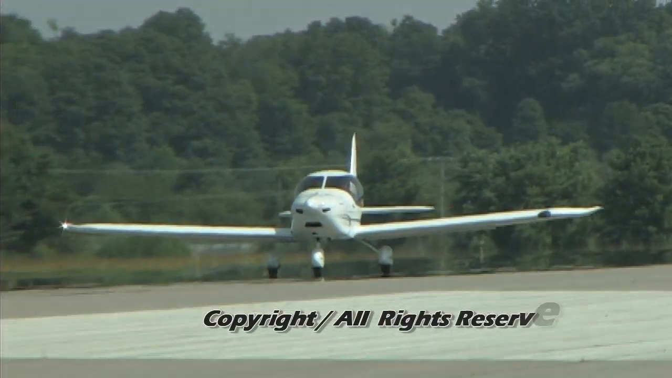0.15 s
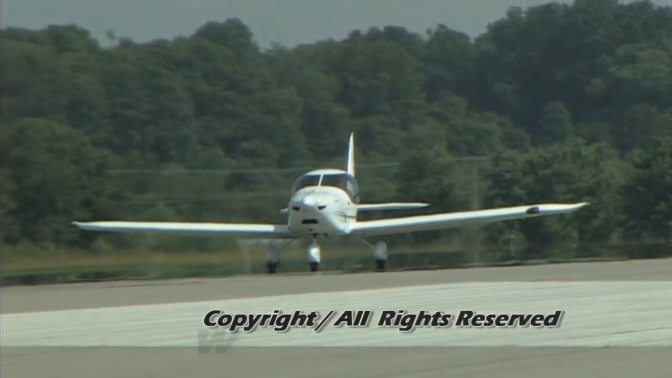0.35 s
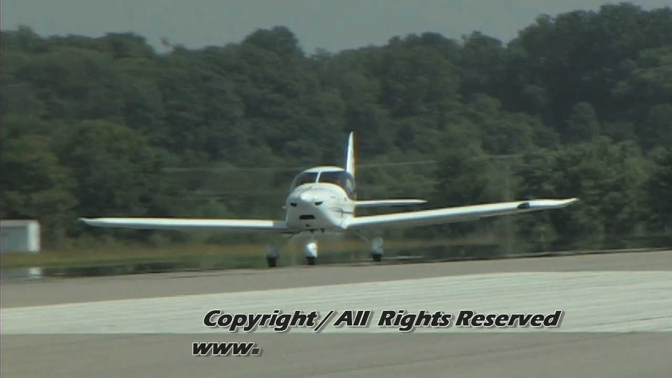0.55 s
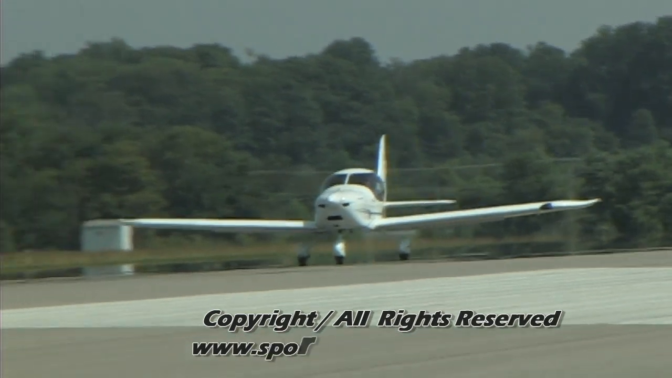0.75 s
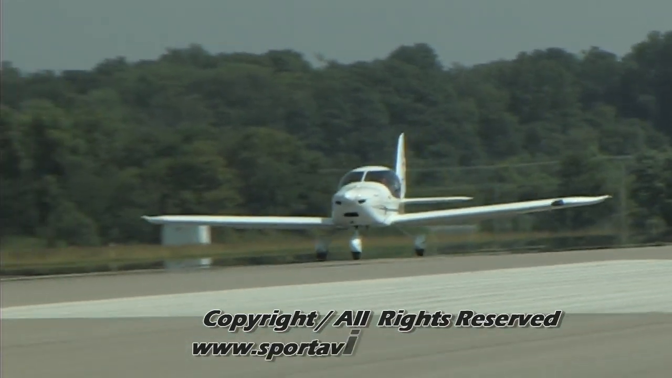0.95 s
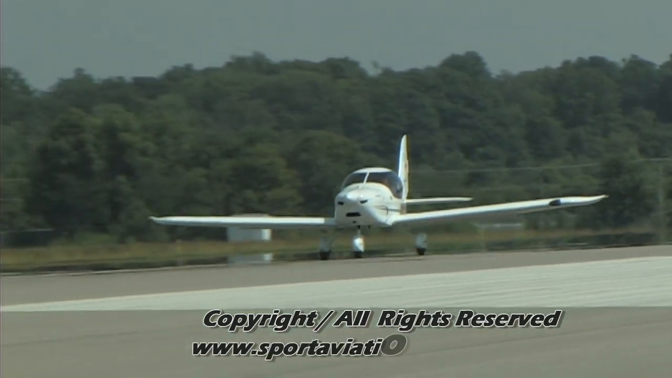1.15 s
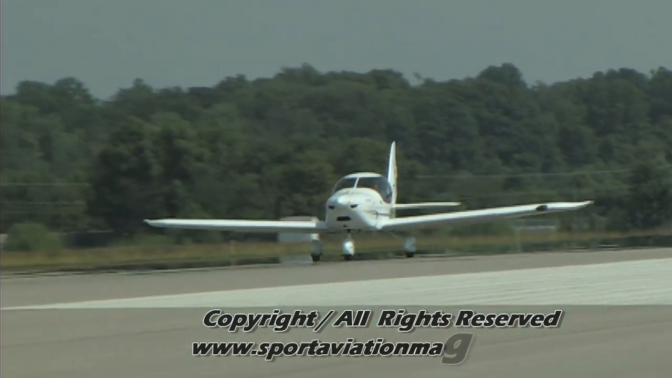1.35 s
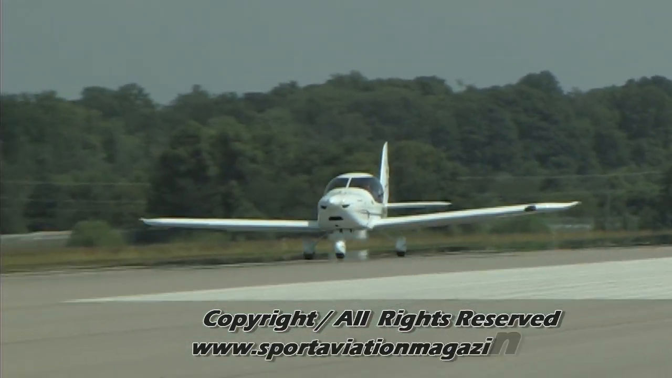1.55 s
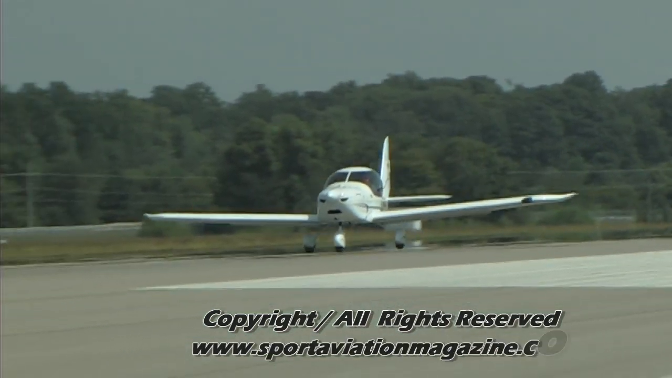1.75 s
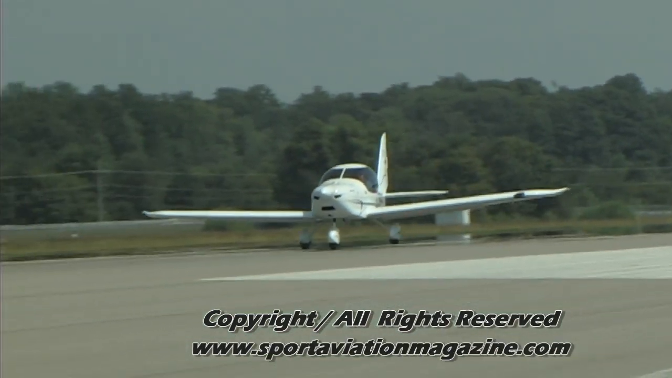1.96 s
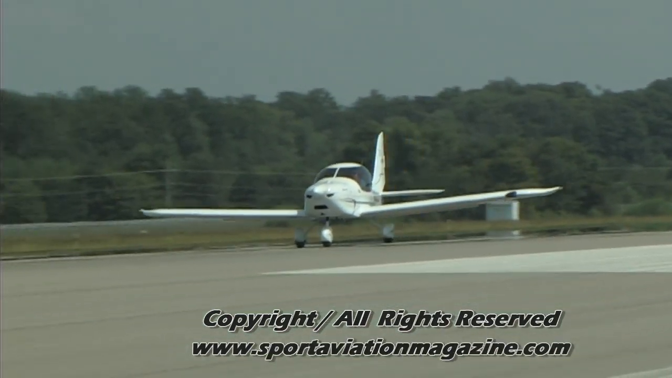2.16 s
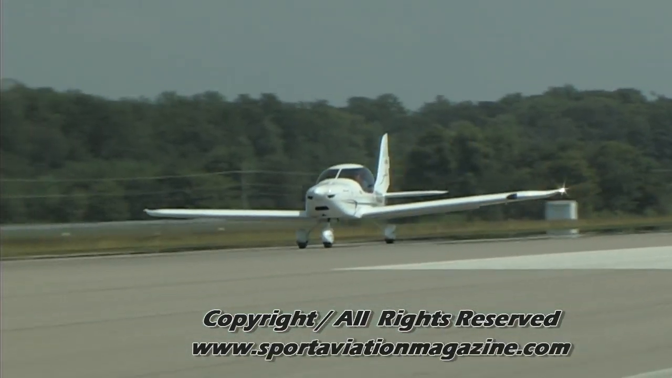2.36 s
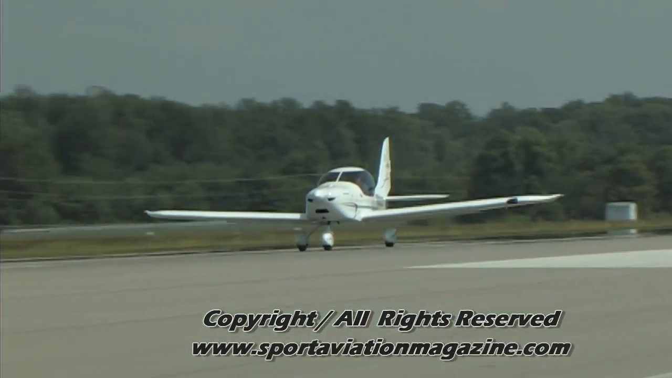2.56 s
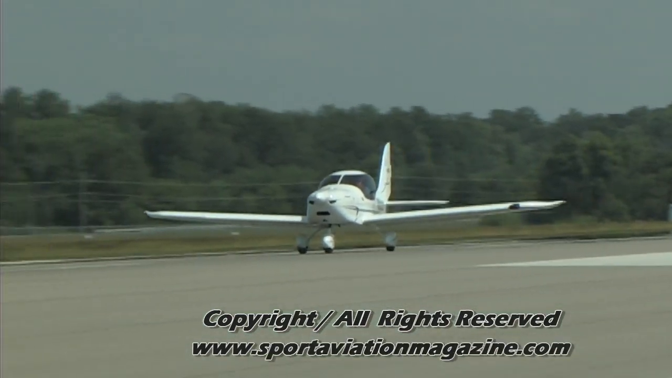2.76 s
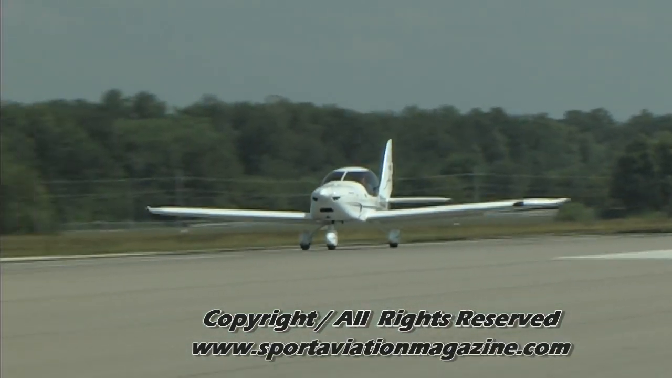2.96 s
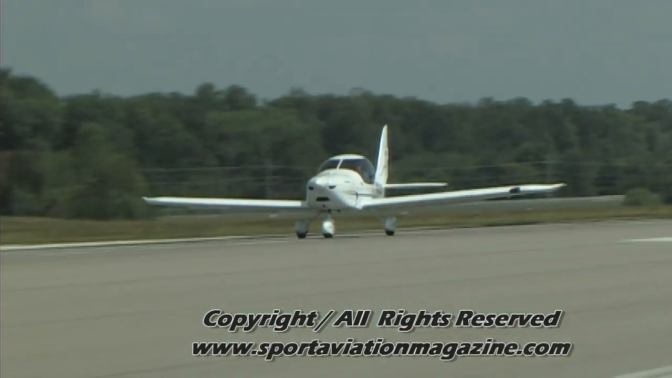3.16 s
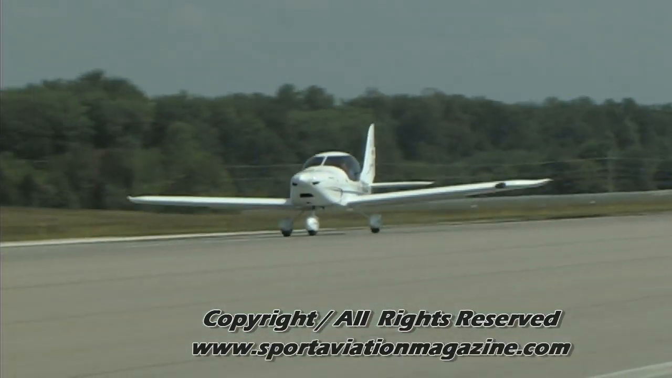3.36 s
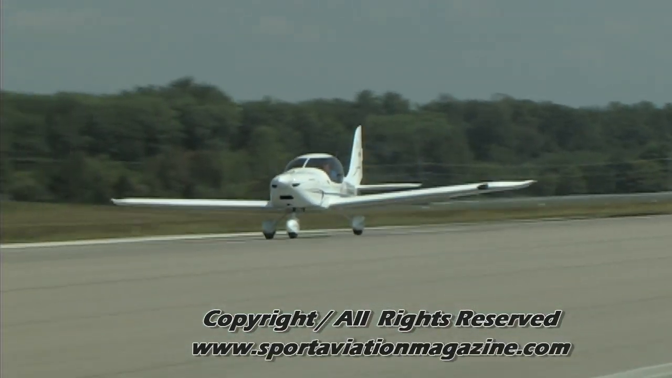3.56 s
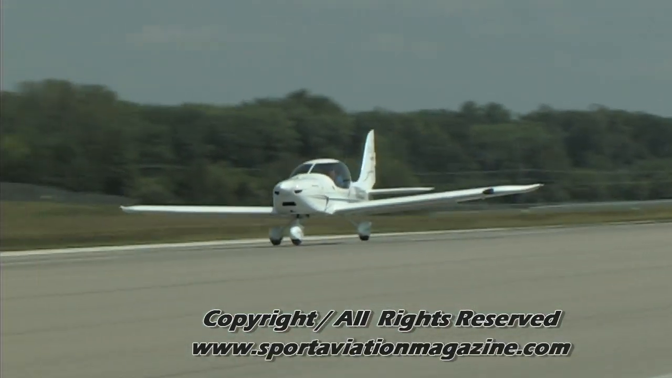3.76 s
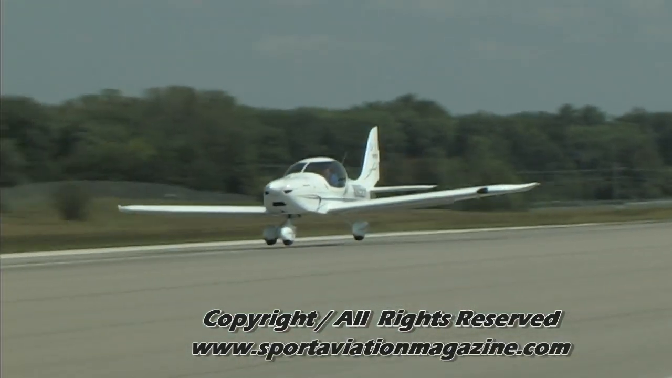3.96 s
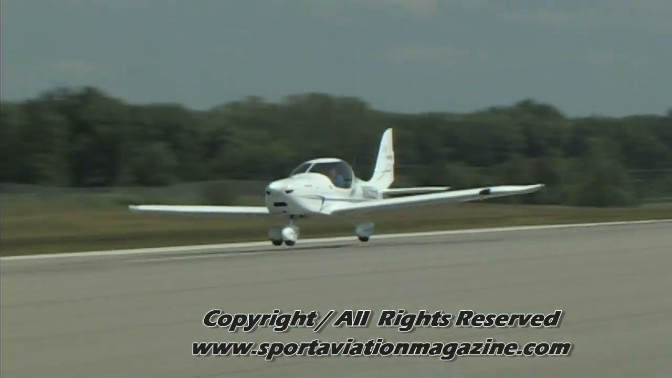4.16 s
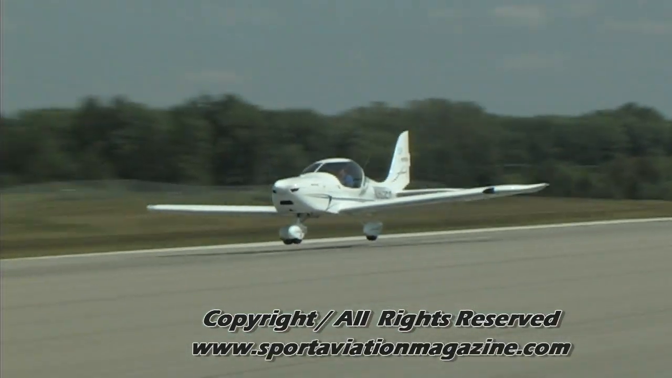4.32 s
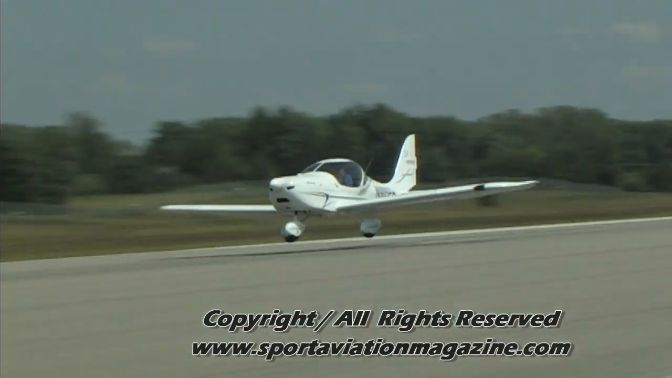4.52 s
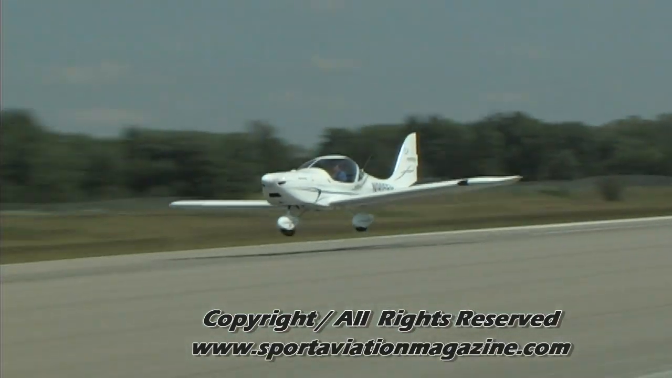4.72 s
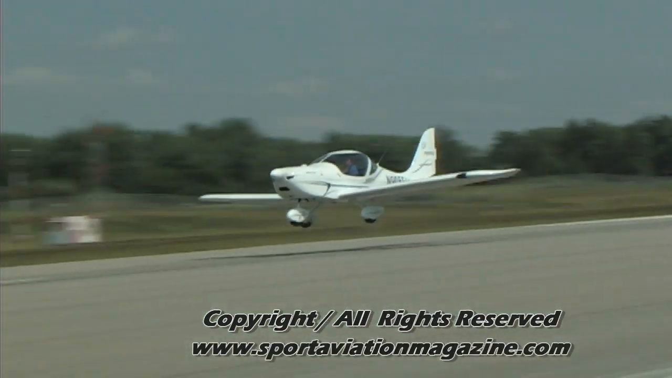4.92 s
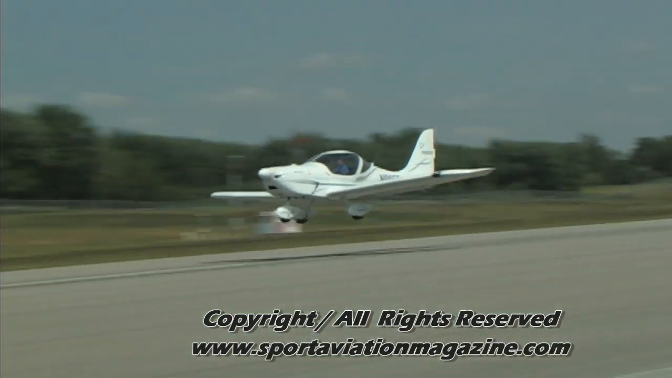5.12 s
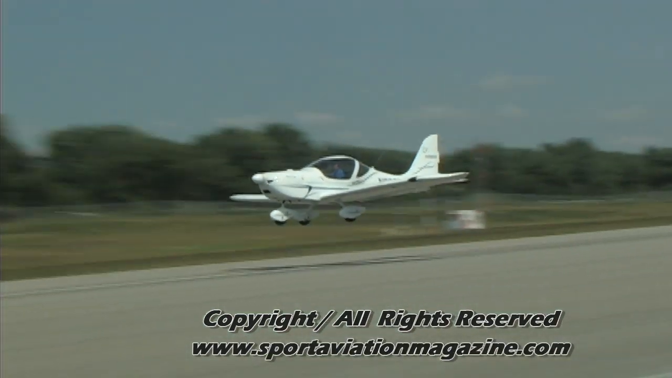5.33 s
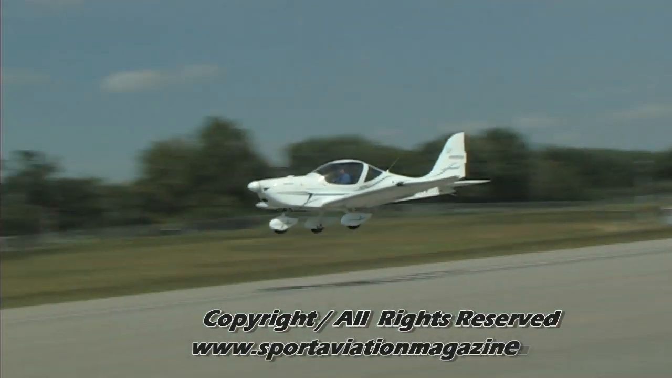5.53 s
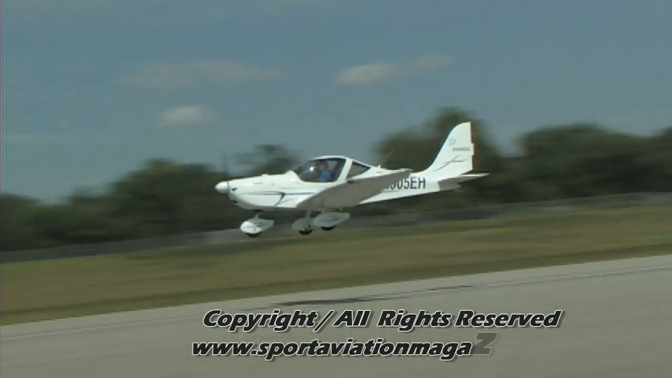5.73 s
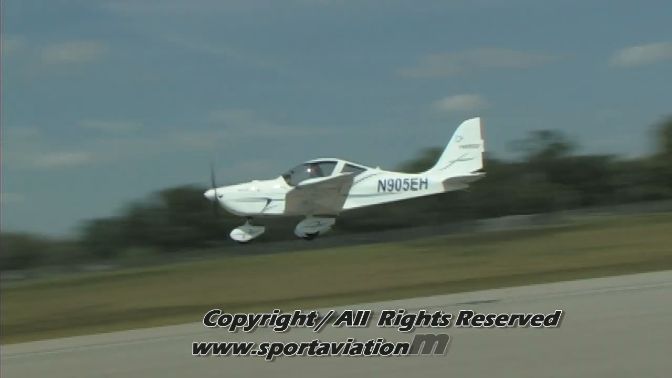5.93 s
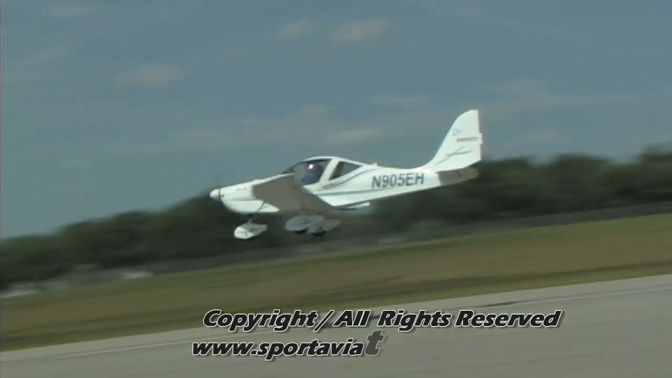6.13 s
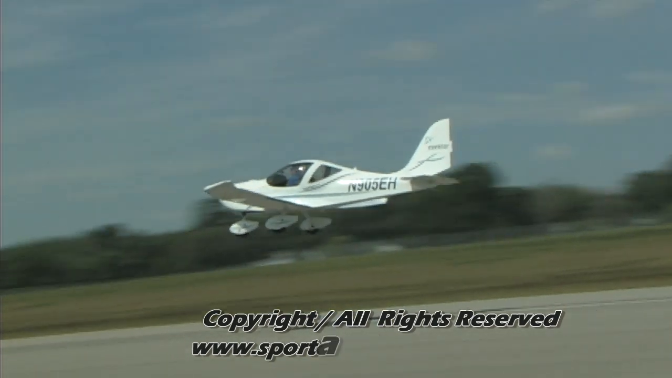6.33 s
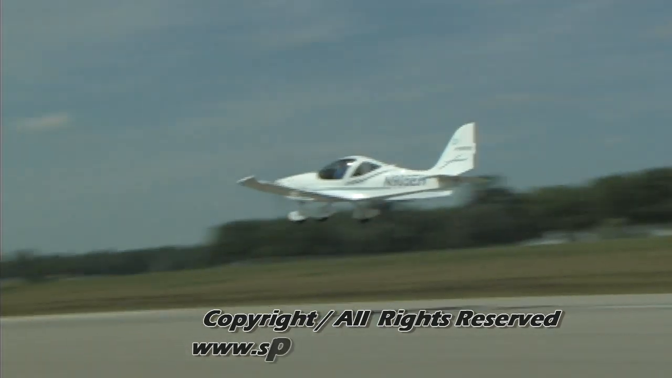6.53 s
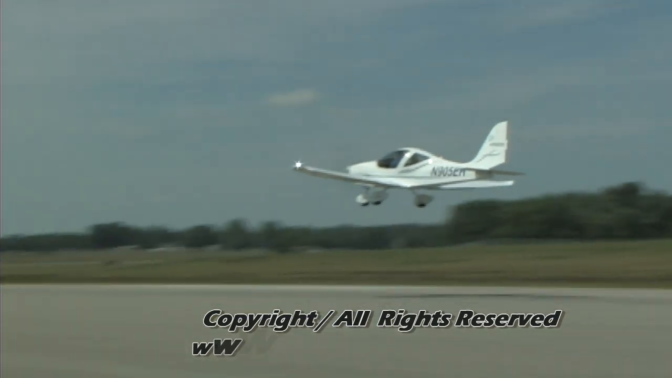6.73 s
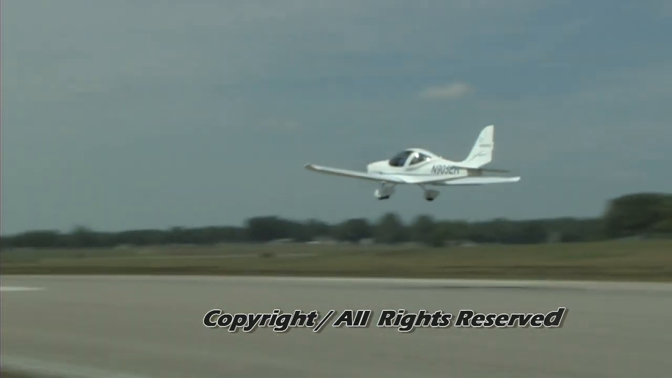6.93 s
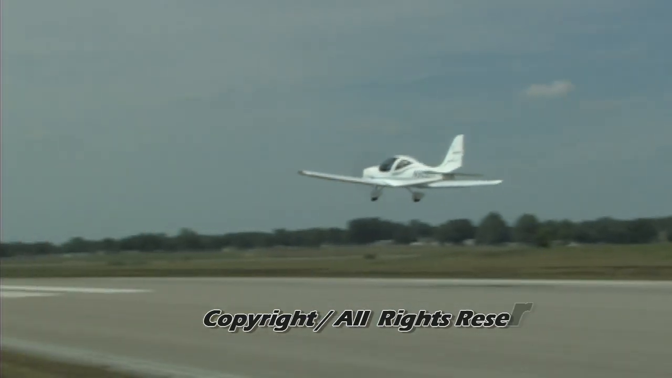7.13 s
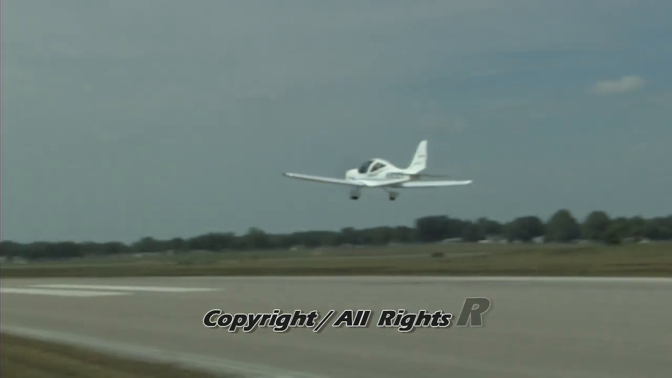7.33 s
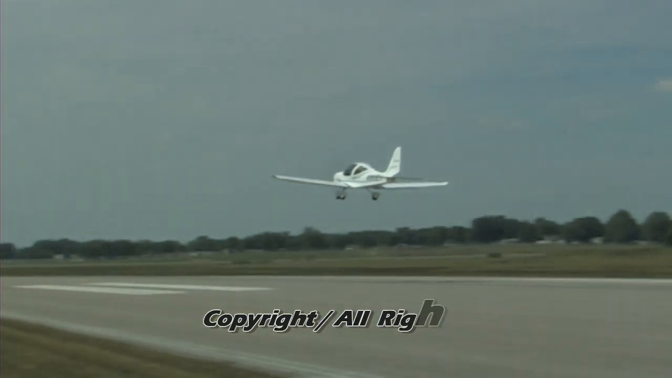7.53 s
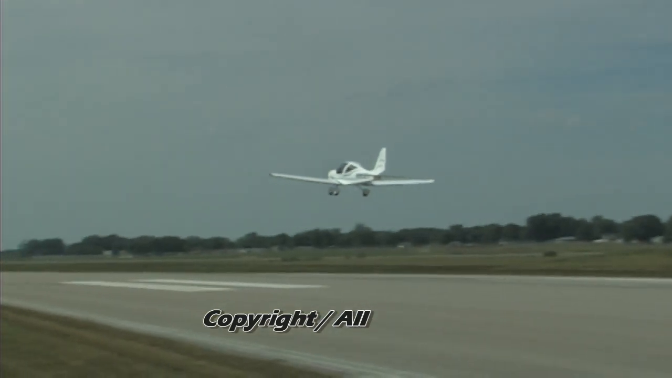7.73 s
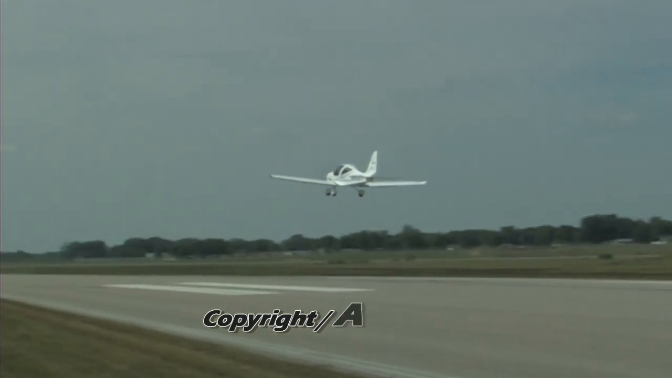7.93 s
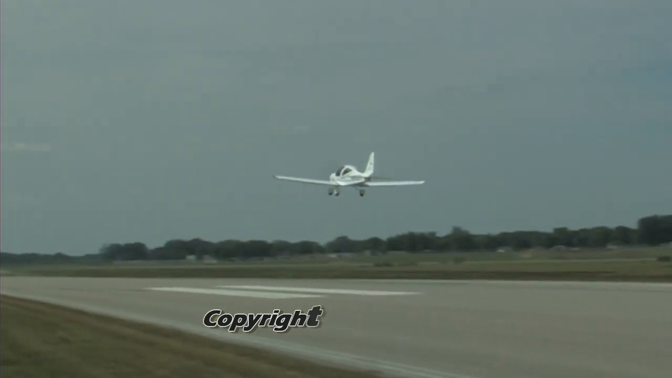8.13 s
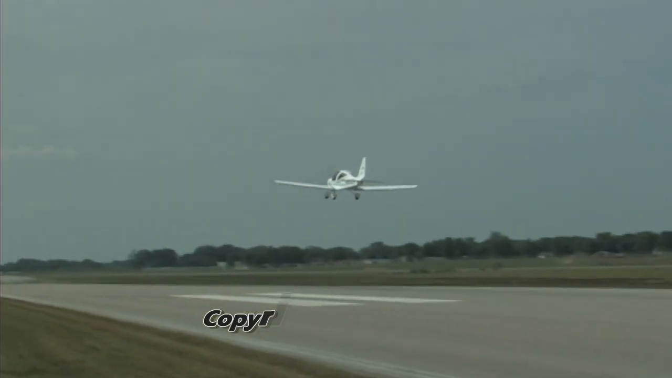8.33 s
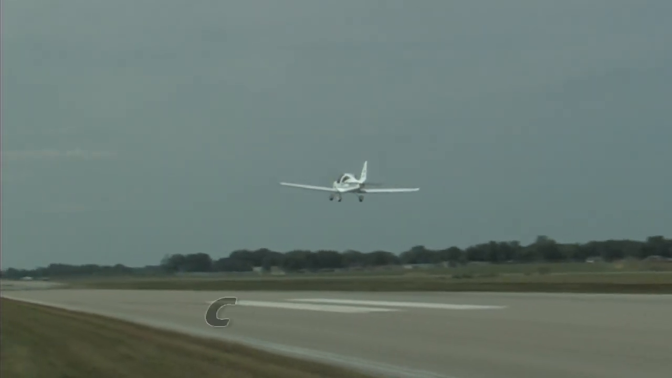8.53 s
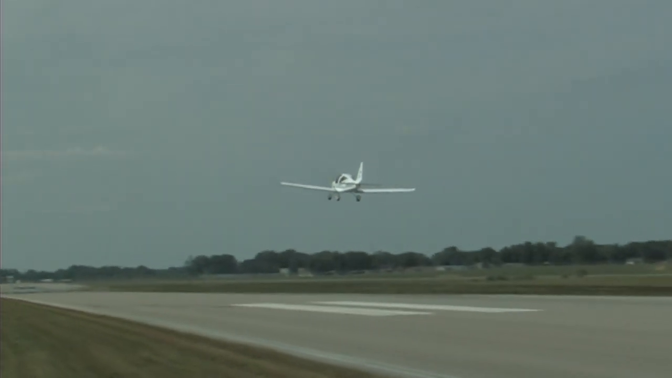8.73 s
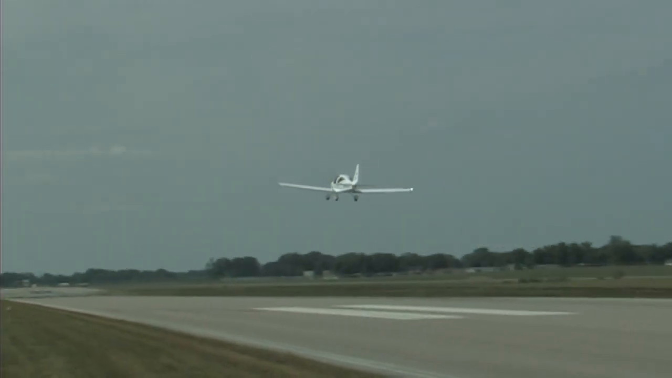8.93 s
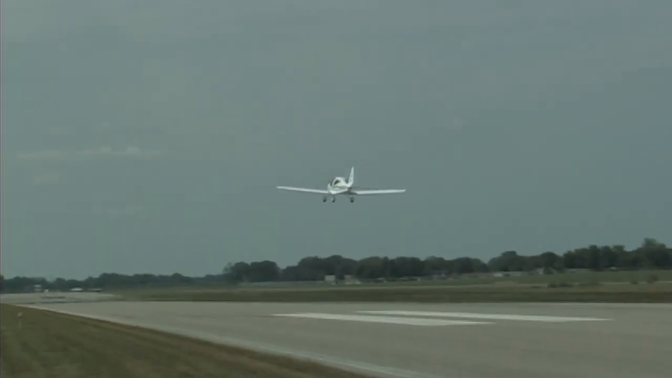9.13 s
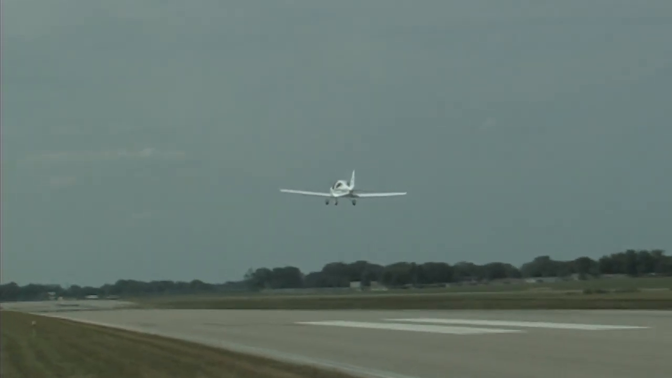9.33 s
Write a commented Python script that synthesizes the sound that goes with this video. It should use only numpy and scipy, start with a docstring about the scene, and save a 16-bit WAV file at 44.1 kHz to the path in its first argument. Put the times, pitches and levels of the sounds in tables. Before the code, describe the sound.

Light aircraft takes off: a buzzing engine grows louder, roars past with a deep blade beat, then recedes lower, leaving faint insect hiss.

```python
"""Light aircraft taking off

A four-cylinder piston engine with a geared three-blade propeller drones nearer, passes and recedes.
Engine orders and blade harmonics are sums of sines, Doppler-shifted and shaped by directional beams.
Turbulence is filtered noise pulsing with blades and firings, combed by the runway's reflection.
Steady noise gives outdoor air and insects; decaying modes give mount ticks; low bursts give breeze puffs."""
import sys
import numpy as np
from scipy import signal
from scipy.fft import rfft, irfft
from scipy.io import wavfile
from scipy.ndimage import uniform_filter1d

SR = 44100
rng = np.random.default_rng(int(sys.argv[2]) if len(sys.argv) > 2 else 0)


def file_out(sig):
    """Save sig as 16-bit WAV at sys.argv[1]."""
    # one column per channel
    cols = np.atleast_2d(sig).T
    # limit, then scale
    lim = np.clip(cols, -1, 1)
    pcm = np.round(lim * 32767).astype(np.int16)
    wavfile.write(sys.argv[1], SR, pcm)


N = 413658
TIME = np.arange(N) / SR
BINS = np.fft.rfftfreq(1024, 1 / SR)  # Hz
FRAMES = np.arange(N // 256 + 5) * 256 / SR  # s

# engine cycles (two crank turns) a second; the rate gains as airspeed unloads the propeller
CYCLE_HZ, CYCLE_GAIN_HZ_PER_S = 41.614, 0.1023
BLADES_PER_CYCLE = 42 / 17  # blade passages in an engine cycle, through the gear


def amp(db):
    """Decibel law: a level in dB becomes an amplitude gain."""
    return 10 ** (np.asarray(db) / 20)


def evened(x):
    """Power normalisation: scales a signal to an rms of one."""
    return x / np.sqrt(np.mean(x ** 2) + 1e-20)


def curves(rows, at=TIME):
    """Linear interpolation: joins the columns of a table by straight lines in time."""
    s, *columns = np.transpose(rows)
    return [np.interp(at, s, column) for column in columns]


def read(points, hz=BINS):
    """Logarithmic pitch scale: joins a spectrum by straight lines over log frequency."""
    f, value = np.transpose(points)
    return np.interp(np.log(hz + 1), np.log(f + 1), value)


def bell(v, centre, width):
    """Gaussian weighting: one at the centre, a half at half the width to either side."""
    return 0.5 ** ((2 * (v - centre) / width) ** 2)


def wander(rate_hz):
    """Slow random modulation: low-passed noise of rms one, falling off above the given rate."""
    size = 2048
    hz = np.fft.rfftfreq(size, TIME[-1] / size)
    spectrum = rfft(rng.standard_normal(size)) / (1 + (hz / rate_hz) ** 4)
    return np.interp(TIME, np.linspace(0, TIME[-1], size), evened(irfft(spectrum)))


def repeating(turns, memory_s=0.452):
    """Cyclostationary noise: a pattern recurs every engine cycle and crossfades into the next."""
    patterns = signal.resample(rng.standard_normal((64, 1024)), 8 * 1024, axis=1)
    age = TIME / memory_s
    row = age.astype(int)
    place = (turns % 1 * patterns.shape[1]).astype(int)
    blend = age % 1 * np.pi / 2
    return evened(np.cos(blend) * patterns[row, place] + np.sin(blend) * patterns[row + 1, place])


# Share of the noise power that repeats with each engine cycle: f/Hz, share/0-1
CYCLE_SHARE = [(600, 0.13), (1000, 0.24), (1500, 0.35), (3500, 0.18), (8000, 0.07)]


def noise(gain, same, turns=None):
    """Subtractive synthesis: two partly correlated channels of noise, weighted in each frame and bin."""
    def spectra(v):
        """Short-time Fourier analysis: the spectrum of each frame."""
        return signal.stft(np.pad(v, (0, 2048)), nperseg=1024, noverlap=768)[2][:, :len(FRAMES)]

    left, other = map(spectra, rng.standard_normal((2, N)))
    if turns is not None:
        locked = read(CYCLE_SHARE)[:, None]
        left = np.sqrt(1 - locked) * left + np.sqrt(locked) * spectra(repeating(turns))
    same = np.clip(same, 0, 1)[:, None]
    right = same * left + np.sqrt(1 - same ** 2) * other
    return signal.istft(np.array([left, right]) * gain, nperseg=1024, noverlap=768)[1][:, :N]


def tone(turns, db, flutter_db, smear):
    """Turbulent scattering: a partial whose level and phase (smear in radians) are shaken by the air."""
    phase = 2 * np.pi * (turns + rng.random()) + smear * wander(8.95)
    return np.sqrt(2) * amp(db + flutter_db * wander(5.7)) * np.cos(phase)


# The take-off run: moment abeam, speed then, acceleration, closest distance
ABEAM_S, SPEED_M_S, ACCEL_M_S2, CLOSEST_M = 6.121, 33.08, 0.616, 29.25
SOUND_M_S = 343


def flight(at=FRAMES):
    """Retarded time and Doppler effect: distance (m), angle from the nose (deg), pitch factor as heard."""
    sent = np.linspace(-9, 5, 2000)  # s from abeam
    along = SPEED_M_S * sent + ACCEL_M_S2 * sent ** 2 / 2
    distance = np.hypot(along, CLOSEST_M)
    arrives = ABEAM_S + sent + (distance - CLOSEST_M) / SOUND_M_S
    angle = np.degrees(np.arctan2(CLOSEST_M, -along))
    doppler = np.gradient(sent, arrives)
    return [np.interp(at, arrives, v) for v in (distance, angle, doppler)]


# Ground absorption at 1 kHz, per metre beyond the closest; only a share of it is left once airborne
GRAZING_DB_PER_M, AIRBORNE_SHARE = 0.1463, 0.34


def heard(beams, hz, at=TIME):
    """Directivity, spherical spreading and ground absorption: level (dB) of a source at the listener."""
    distance, angle, _ = flight()
    power = sum(amp(db) ** 2 * bell(angle, direction, width) for direction, width, db in beams)
    grazing_m = (distance - CLOSEST_M) * np.where(FRAMES < ABEAM_S, 1, AIRBORNE_SHARE)
    spreading_db = 20 * np.log10(distance / CLOSEST_M)
    ground_db = GRAZING_DB_PER_M * np.sqrt(hz / 1000) * grazing_m
    return np.interp(at, FRAMES, 10 * np.log10(power + 1e-14) - spreading_db - ground_db)


# Colour of the open air: f/Hz, relative level/dB per Hz
AIR_COLOUR = [(20, -11), (45, 0), (110, 5.5), (300, -8), (700, -19.5), (1500, -19), (3000, -25),
              (7000, -29), (10000, -32), (16000, -31)]
# Colour of insects in the grass, and of shriller ones: f/Hz, relative level/dB per Hz
GRASS_COLOUR = [(2500, -42), (3300, -4.5), (3800, -2), (4250, -0.5), (4700, -3), (5100, -4), (5800, -7.5),
                (7500, -19.5), (11000, -53)]
SHRILL_COLOUR = [(3800, -35), (4600, -13.5), (4950, 10), (5350, 2.5), (5900, -26), (6300, -20), (6900, -17),
                 (7600, -27), (10000, -36.5)]
# Insect levels: t/s, grass level/dB, shrill level/dB
INSECT_LEVELS = [(0, -80, -86.5), (2.2, -77.5, -92), (2.7, -73, -93), (3.3, -76.5, -93), (8.4, -80, -90),
                 (8.85, -73.5, -75), (9.38, -71, -72)]
# Correlation of the two channels, for insects and turbulence: f/Hz, correlation/0-1
CHANNEL_LIKENESS = [(30, .6), (80, 0.94), (400, .99), (1000, 0.92), (2000, .97), (4000, 0.97), (8000, 1),
                    (14000, 0.83)]


def airfield(air_db=-62):
    """Stationary noise: coloured, weakly correlated outdoor air, and insect hiss in narrower bands."""
    air_likeness = read([(30, 0.7044), (200, 0.4768), (5000, 0.2062), (12000, 0.0945)])
    out = amp(air_db) * evened(noise(amp(read(AIR_COLOUR))[:, None], air_likeness))
    for colour, db in zip((GRASS_COLOUR, SHRILL_COLOUR), curves(INSECT_LEVELS)):
        hiss = evened(noise(amp(read(colour))[:, None], read(CHANNEL_LIKENESS)))
        out += amp(db + 0.99 * wander(10.55)) * hiss
    return out


# Beams of the exhaust: direction from the nose/deg, width/deg, level at the closest distance/dB
FIRING_BEAMS = [(44.6, 80.93, -34.5), (135, 60, -36)]  # order 4, the firing rate
FIRING_OCTAVE_BEAMS = [(17.5, 27.93, -39.5), (109.58, 56, -42.5)]  # order 8
PIPE_BEAMS = [(0, 45.447, -28.5), (112, 67.6, -50), (161.13, 29.89, -43)]  # order 7, the pipe tone
WHINE_BEAMS = [(31, 31, -41), (140, 51.4, -59.5)]  # order 19
# Beams of the side tones one and three blade rates above the pipe tone: the same columns
CHOP_BEAMS = [(37.8, 33, -35.5), (108, 39, -44.5), (139.87, 23.6, -37)]
HIGH_CHOP_BEAMS = [(98.33, 33, -46), (160, 50, -55)]
# Weaker engine orders: order, level ahead/dB, level abeam/dB, level behind/dB
WEAKER_ORDERS = [(5, -43, -51, -71), (6, -51.5, -66.5, -62), (9, -47.5, -43.5, -48), (11, -69, -67, -55),
                 (12, -46, -41, -45.5), (13, -52, -53, -80), (15, -58, -67, -58.5), (18, -43, -55.5, -80),
                 (20, -54, -74, -73), (21, -47, -75, -77), (23, -59, -59, -66.5), (33, -58, -75, -82),
                 (42, -54, -69, -82)]
# The three beams those orders share: direction/deg, width/deg
SHARED_BEAMS = [(35, 29.5), (98, 55), (150, 17)]


def exhaust(turns, blade_turns, chop_db=-9):
    """Engine-order harmonics and modulation: uneven firings give orders; the blades chop in side tones."""
    firing, pipe = 4, 7
    out = tone(firing * turns, heard(FIRING_BEAMS, firing * CYCLE_HZ), 0.6646, 0.07)
    out += tone(pipe * turns, heard(PIPE_BEAMS, pipe * CYCLE_HZ), 0.8672, 0.18)
    for k, beams in ((1, CHOP_BEAMS), (3, HIGH_CHOP_BEAMS)):
        order = pipe + k * BLADES_PER_CYCLE
        out += tone(order * turns, heard(beams, order * CYCLE_HZ), 0.24, 0.056)

    weaker = [(8, FIRING_OCTAVE_BEAMS), (19, WHINE_BEAMS)]
    for order, *sides in WEAKER_ORDERS:
        weaker.append((order, [(*beam, db) for beam, db in zip(SHARED_BEAMS, sides)]))
    for order, beams in weaker:
        db = heard(beams, order * CYCLE_HZ)
        out += tone(order * turns, db, 1.2557, 0.022 * order)
        out += tone(order * turns + blade_turns, db + chop_db, 1.4, 0.049 * order)
    return out


# Beams of the blade rate and its octave: direction from the nose/deg, width/deg, level at closest/dB
BLADE_BEAMS = [(10.285, 4.2, -42), (34.655, 17, -40.5), (102.59, 37.209, -27), (157.84, 4.71, -50.5)]
BLADE_OCTAVE_BEAMS = [(9.94, 21.05, -40), (45.15, 21, -43), (86.69, 31, -36), (161.16, 27.24, -50.5)]


def propeller(blade_turns, fall_db_per_octave=33, third_db=-8):
    """Blade-passage harmonics: phase-aligned sines form each blade's pressure wave, strongest near abeam."""
    blade_hz = BLADES_PER_CYCLE * CYCLE_HZ
    second = heard(BLADE_OCTAVE_BEAMS, 2 * blade_hz)
    levels = [heard(BLADE_BEAMS, blade_hz), second]
    for harmonic in range(3, 9):
        levels.append(second + third_db - fall_db_per_octave * np.log2(harmonic / 3))
    out = np.zeros(N)
    for harmonic, db in enumerate(levels, 1):
        # higher harmonics are less steady
        gain = amp(db + 0.3 * (harmonic - 1) * wander(4.6))
        out += gain * np.sin(2 * np.pi * harmonic * blade_turns)
    return np.sqrt(2) * out


# The echo is steepest just past abeam; comb spacing and echo strength run from flat to steep
STEEP_DEG, STEEP_WIDTH_DEG = 108.7, 50
COMB_FLAT_HZ, COMB_STEEP_HZ = 2190, 1640
ECHO_FLAT, ECHO_STEEP = 0.049, 0.57


def ground_echo(fade_hz=14000):
    """Two-path interference: the runway's echo cuts a comb of notches that slides as the aircraft passes."""
    steep = bell(flight()[1], STEEP_DEG, STEEP_WIDTH_DEG)
    spacing = COMB_FLAT_HZ + (COMB_STEEP_HZ - COMB_FLAT_HZ) * steep
    strength = ECHO_FLAT + (ECHO_STEEP - ECHO_FLAT) * steep
    hz = BINS[:, None]
    echo = strength * np.exp(-hz / fade_hz)
    lag = hz / spacing - 0.06  # in periods
    return abs(1 + echo * np.exp(-2j * np.pi * lag)) / np.sqrt(1 + echo ** 2)


# Colour of the turbulence: f/Hz, relative level/dB per Hz
TURBULENCE_COLOUR = [(25, -34), (50, -18), (85, -11), (130, 0), (340, 1.5), (620, -2.5), (900, -2.5),
                     (1300, -8.5), (2100, -12), (3200, -18.5), (7000, -23), (10000, -28), (13000, -47.5),
                     (16000, -59)]
# Its change when heard from the side and from behind: f/Hz, change/dB
FROM_SIDE = [(150, -2.5), (600, 2.5), (800, -1.5), (1020, -5), (1350, 4.5), (1900, 2), (2400, 7.5),
             (2850, 2.5), (3450, 5), (4200, 1.5), (5400, 1.5), (9500, -1), (12000, 4.5)]
FROM_BEHIND = [(600, 6.5), (950, 3.5), (1200, -4), (1620, 2.5), (2000, -1.5), (2750, 3), (3250, 5.5),
               (3900, 3), (4550, 0), (5200, 3.5), (6600, 4), (8500, 1)]
# Bands of rumble, roar, rasp and hiss: low f/Hz, high f/Hz
TURBULENCE_BANDS = [(110, 500), (500, 1100), (1300, 3000), (3500, 10000)]
# Beams of each band: direction from the nose/deg, width/deg, level at closest before swells and trim/dB
RUMBLE_BEAMS = [(0, 33.18, -32.5), (48.49, 45, -36), (118, 70, -38)]  # exhaust
ROAR_BEAMS = [(0, 22, -41.5), (37.53, 36.6, -35), (76, 59, -39.5), (184, 87, -39.5)]  # exhaust
RASP_BEAMS = [(0, 22, -44), (37.4, 14.3, -31.5), (89.272, 58.703, -36.5), (165.2, 15.7, -46)]  # blades
HISS_BEAMS = [(33.4, 15.4, -42.5), (44.28, 69, -48), (108, 37.3, -46.5), (181.36, 45.5, -50.5)]  # blade tips
# Brief swells and dips: t/s, length/s, level change/dB, centre f/Hz
BRIEF_SWELLS = [(1.5, 0.73, 4, 2300), (1.998, 0.14, 4.5, 2300), (2.627, 0.53, 7.5, 3300),
                (3.567, 0.088, 3, 2000), (4.0, .1, -2.5, 4000), (4.145, 0.1, 3, 5000),
                (4.26, 0.14, 5, 3000), (4.414, 0.11, -2.5, 3600), (5.092, 0.1258, 2, 3000),
                (5.492, 0.0854, 2.5, 6000)]
SIDE_DEG = (45.4, 69.08, 129, 143)  # the side colour sets in, is full, starts to fade, is gone
TAIL_DEG = (122, 153)  # the tail colour sets in, is full


def turbulence_gain(patchy_db=1.0, swell_octaves=4.5):
    """Directional spectral shaping: gain over pitch and time from colour, echo, beams, swells and patches."""
    angle = flight()[1]
    side_db = np.outer(read(FROM_SIDE), np.interp(angle, SIDE_DEG, [0, 1, 1, 0]))
    tail_db = np.outer(read(FROM_BEHIND), np.interp(angle, TAIL_DEG, [0, 1]))
    colour = amp(read(TURBULENCE_COLOUR)[:, None] + side_db + tail_db) * ground_echo()

    field_db = np.zeros(colour.shape)
    for s, length, db, hz in BRIEF_SWELLS:
        across_pitch = bell(np.log2(BINS + 1), np.log2(hz), swell_octaves)
        field_db += db * np.outer(across_pitch, bell(FRAMES, s, length))

    # each band is brought to its beams' level; corrections blend between band centres
    centres = np.log(np.prod(TURBULENCE_BANDS, axis=1)) / 2
    band_beams = (RUMBLE_BEAMS, ROAR_BEAMS, RASP_BEAMS, HISS_BEAMS)
    for (lo, hi), beams, own in zip(TURBULENCE_BANDS, band_beams, np.eye(len(centres))):
        inside = ((BINS > lo) & (BINS < hi))[:, None]
        power = np.mean(colour ** 2 * inside, axis=0)
        db = heard(beams, np.sqrt(lo * hi), FRAMES) - 10 * np.log10(power)
        field_db += np.outer(np.interp(np.log(BINS + 1), centres, own), db)

    patches = uniform_filter1d(rng.standard_normal(colour.shape), size=9, axis=0)
    patches = uniform_filter1d(patches, size=24, axis=1)
    return colour * amp(field_db + patchy_db * evened(patches))


# Blade beat: direction and width of its maximum, depth (0-1) away from it and at it
BEAT_DEG, BEAT_WIDTH_DEG = 103.2, 70.6
BEAT_FAR, BEAT_ABEAM = 0.0802, 0.46


def rush(turns, blade_turns, trim_db=-0.34, flicker_db=0.5398, firing_depth=0.10244, lope_depth=0.059):
    """Amplitude-modulated turbulence: broadband noise pulses with each blade, firing and engine cycle."""
    air = noise(amp(trim_db) * turbulence_gain(), read(CHANNEL_LIKENESS), turns)
    view = bell(flight(TIME)[1], BEAT_DEG, BEAT_WIDTH_DEG)
    depth = BEAT_FAR + (BEAT_ABEAM - BEAT_FAR) * view
    beat = depth * np.cos(2 * np.pi * blade_turns)
    roar = signal.sosfiltfilt(signal.butter(2, 1200, fs=SR, output="sos"), air)
    hiss = air - roar
    firings = firing_depth * np.cos(2 * np.pi * 4 * turns)
    lope = lope_depth * np.cos(2 * np.pi * turns)
    # the hiss beats less deeply than the roar
    beating = roar * (1 + beat) + hiss * (1 + 0.6294 * beat)
    return beating * (1 + firings + lope) * amp(flicker_db * wander(17.38))


# Knocks on the microphone mount: t/s, peak level/dB
MOUNT_TICKS = [(.108, -50), (.152, -50), (.277, -49)]
# Modes of the mount: f/Hz, relative level/dB, time to fall by 60 dB/s
MOUNT_MODES = [(880, -12.5, 0.0183), (1050, 2, 0.01742), (1350, 0, 0.011), (2014, -6, .007)]


def ticks():
    """Modal resonance: tiny knocks excite decaying sines in the mount for a few milliseconds."""
    t = np.arange(SR // 20) / SR
    ring = sum(amp(db - 60 * t / t60) * np.sin(2 * np.pi * hz * t) for hz, db, t60 in MOUNT_MODES)
    knocks = np.zeros(N)
    for s, db in MOUNT_TICKS:
        knocks[round(s * SR)] = amp(db)
    return signal.oaconvolve(knocks, ring / abs(ring).max())[:N]


# Breeze puffs on the microphone: t/s, peak level/dB, centre f/Hz, length/s
BREEZE_PUFFS = [(.63, -54, 150, 0.076), (1.248, -51.5, 176, 0.055), (1.47, -48, 157.7, 0.0533),
                (3.433, -45.5, 140.2, 0.048), (3.865, -51, 61.41, .09), (5.245, -42, 55.4, .07)]


def puffs(smear=0.964):
    """Wind-induced pressure: each puff is a low tone of unsteady phase (smear in radians) in a short bell."""
    out = np.zeros(N)
    for s, db, hz, length in BREEZE_PUFFS:
        phase = 2 * np.pi * (hz * TIME + rng.random()) + smear * wander(25)
        out += amp(db) * np.exp(-(2 * (TIME - s) / length) ** 2) * np.cos(phase)
    return out


def scene(unsteady=0.001013):
    """Superposition: one crankshaft phase drives exhaust, propeller and pulsing noise, all centred."""
    cycle_hz = (CYCLE_HZ + CYCLE_GAIN_HZ_PER_S * TIME) * flight(TIME)[2]
    turns = np.cumsum(cycle_hz * (1 + unsteady * wander(3.54))) / SR
    blade_turns = BLADES_PER_CYCLE * turns
    aircraft = exhaust(turns, blade_turns) + propeller(blade_turns) + rush(turns, blade_turns)
    return airfield() + aircraft + ticks() + puffs()


# Phase difference of the capsules, left over right, before weighting: f/Hz, phase/rad
CAPSULE_LEAD = [(0, -0.092), (1890, 0.14), (2150, -0.473), (3100, 0.25), (3530, -0.208), (4820, 0.0458),
                (12300, -0.1), (13300, -0.3), (15200, 0.1)]


def record(dry, edge_hz=15700):
    """Linear filtering: two capsules differ a little in level and phase; a low-pass limits the band."""
    hz = np.fft.rfftfreq(N, 1 / SR)
    lean_db = read([(100, 0.8779), (350, 0.37), (1400, 0.951), (2800, 0.65),
                    (5000, 0), (9500, 2.5), (14000, -0.5)], hz)
    lead = read(CAPSULE_LEAD, hz) * np.interp(hz, [250, 900], [0.2, 1.3])
    # each capsule takes half of the difference
    lean = amp(lean_db / 2) * np.exp(0.5j * lead)
    coloured = irfft(rfft(dry) * np.array([lean, 1 / lean]), N)
    low_pass = signal.firwin(511, edge_hz, window=("kaiser", 9), fs=SR)
    return signal.oaconvolve(coloured, low_pass[None], "same")


dry = scene()
out = record(dry)
file_out(out)
```